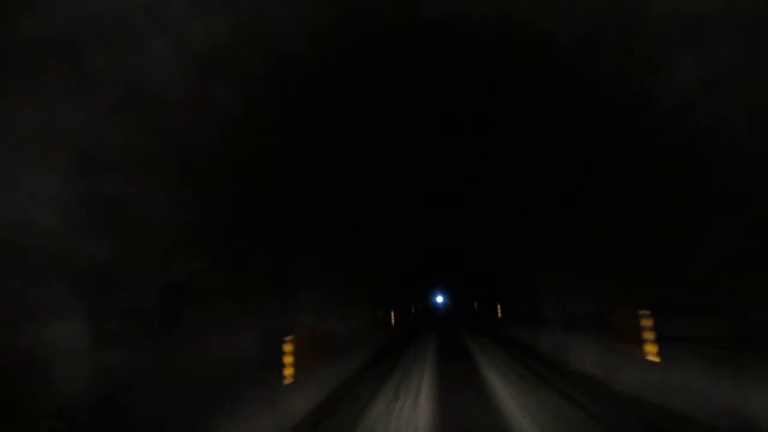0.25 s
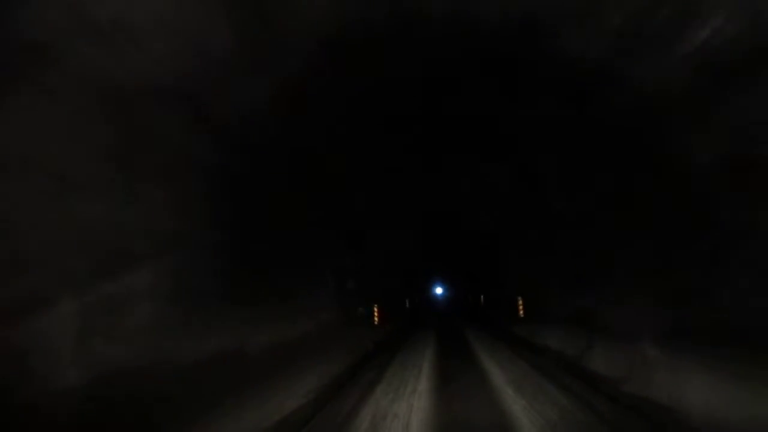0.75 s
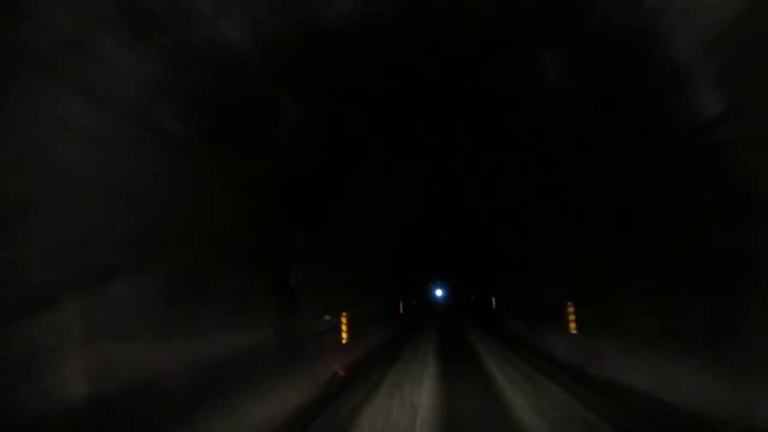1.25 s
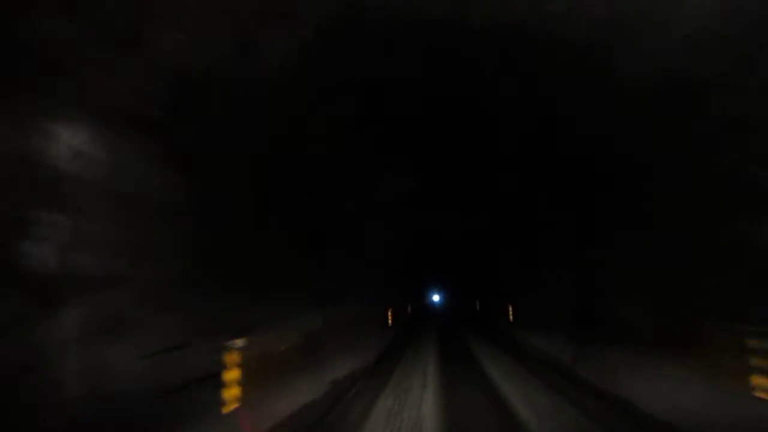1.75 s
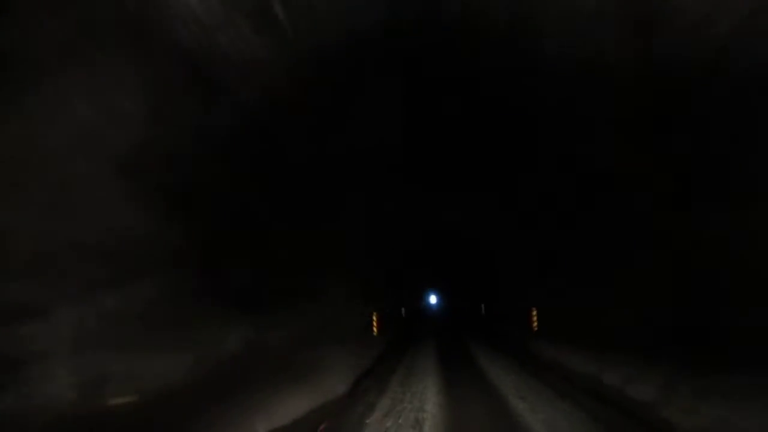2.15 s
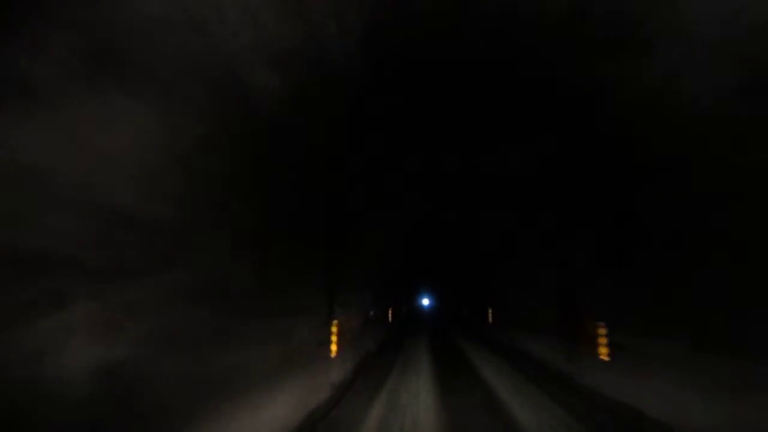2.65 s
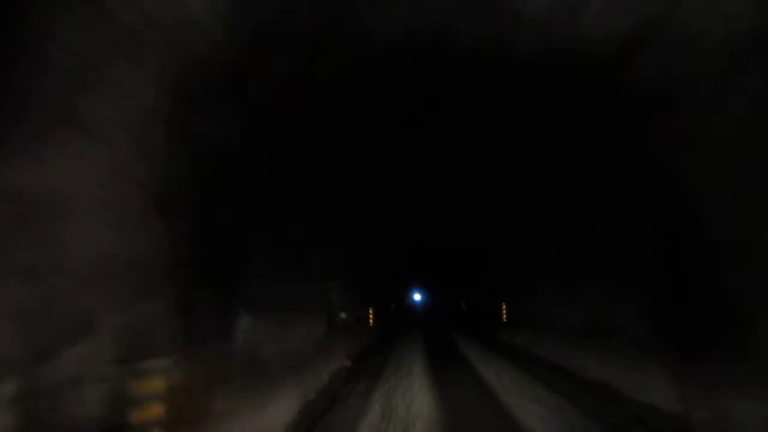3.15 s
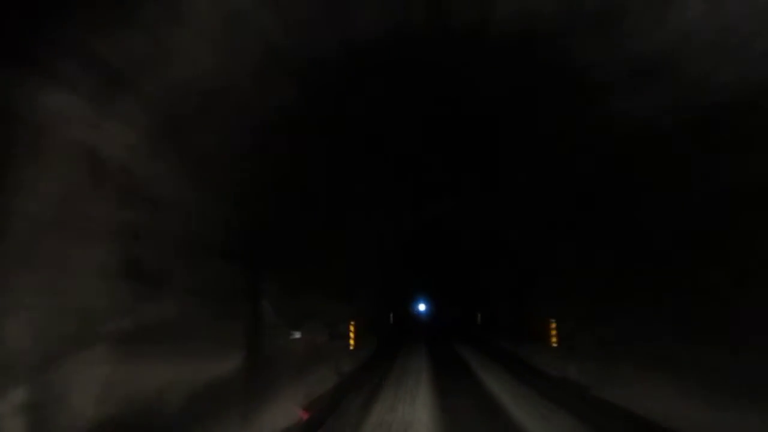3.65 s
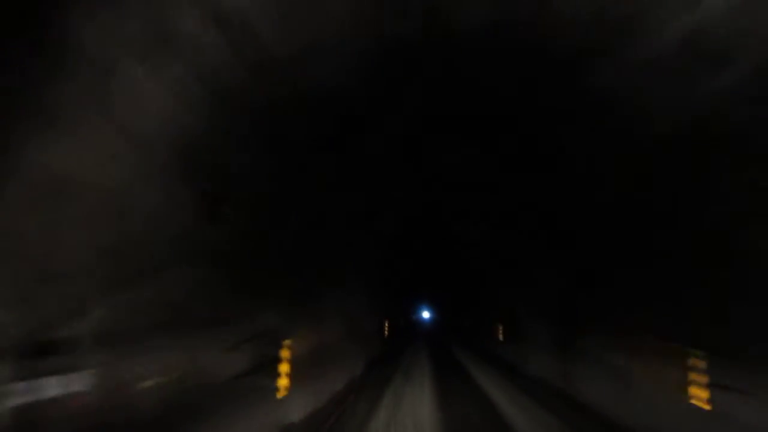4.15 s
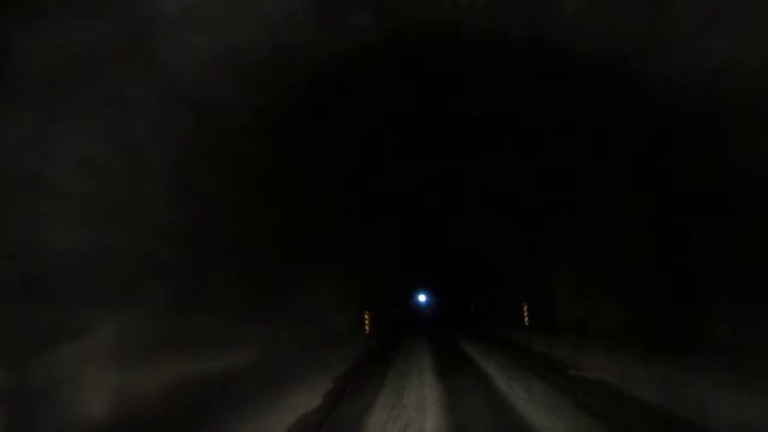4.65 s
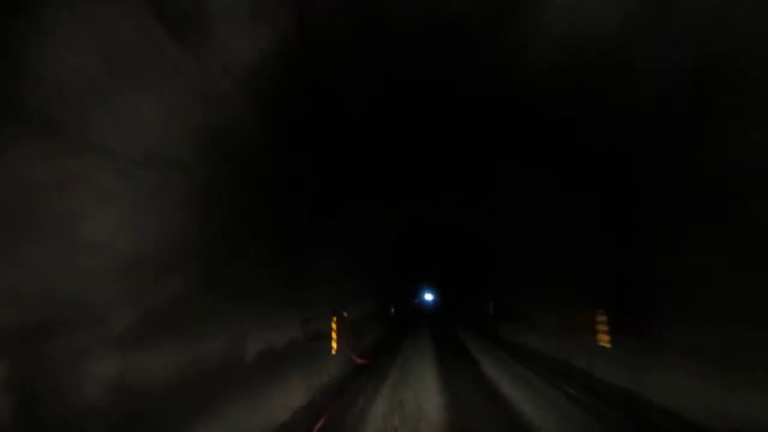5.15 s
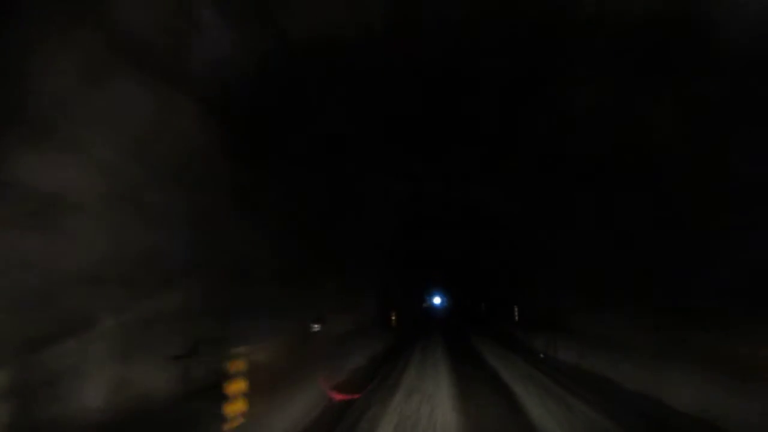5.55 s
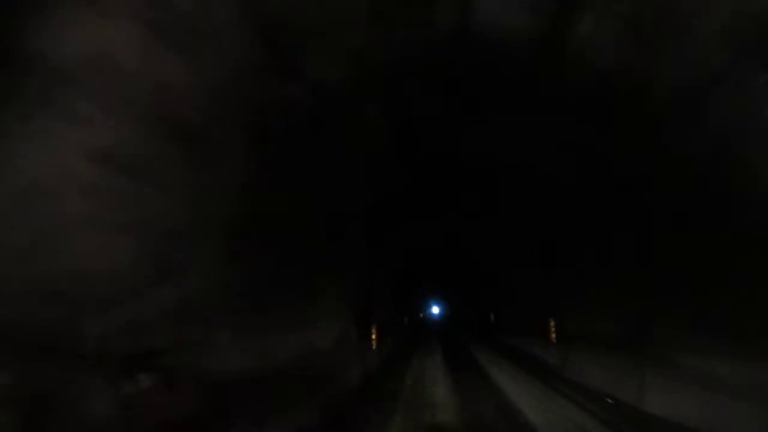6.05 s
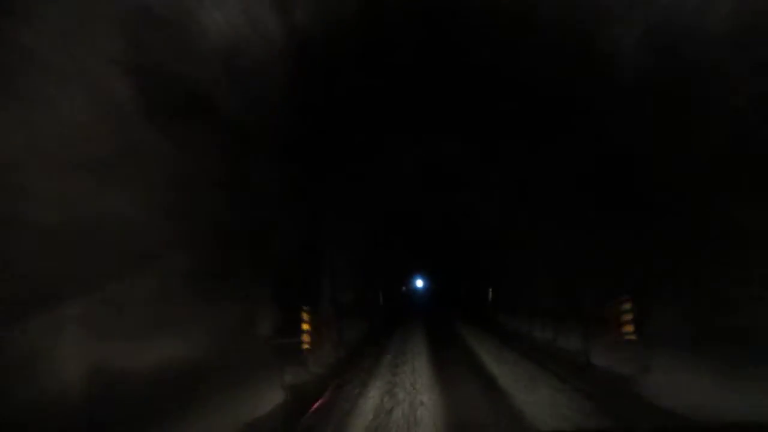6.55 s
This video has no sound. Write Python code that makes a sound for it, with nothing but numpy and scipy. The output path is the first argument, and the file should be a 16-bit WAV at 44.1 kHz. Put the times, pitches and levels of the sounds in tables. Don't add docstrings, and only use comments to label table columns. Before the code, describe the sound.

Inside a car driving steadily through a wet tunnel: deep bumpy boom, tyre roar and hiss, faint rattles, one sharp stone crack near the end.

```python
import sys
import numpy as np
from scipy import signal
from scipy.fft import rfft, irfft
from scipy.io import wavfile
from scipy.ndimage import uniform_filter1d

SR = 44100
rng = np.random.default_rng(int(sys.argv[2]) if len(sys.argv) > 2 else 0)


def generate_wav(signal):
    frames = np.transpose(np.atleast_2d(signal))
    scaled = np.clip(frames, -1, 1) * 32767
    pcm = np.round(scaled).astype(np.int16)
    wavfile.write(sys.argv[1], SR, pcm)


def invert_db(x):
    u = np.asarray(x, float) / 20
    return 10 ** u


N = 300321


def rms_one(x):
    return x / np.sqrt(np.mean(x ** 2) + 1e-20)


def in_time(rows):
    s, *columns = np.transpose(rows)
    return [np.interp(np.arange(N) / SR, s, c) for c in columns]


def drift(rate):
    r = np.exp(-80 * np.pi * rate / SR)
    coarse = rng.standard_normal(N // 40 + 2002)
    slow = signal.lfilter([1], [1, -2 * r, r * r], coarse)[2000:]
    return np.interp(np.arange(N) / 40, np.arange(len(slow)), rms_one(slow - slow.mean()))


def coloured(spectrum, patchy_db, white=None):
    hz = np.maximum(np.arange(N // 2 + 1) * SR / N, 1)
    points = np.array(spectrum)
    white = rng.standard_normal(N) if white is None else white
    shaped = rfft(white) * invert_db(np.interp(np.log(hz), np.log(points[:, 0]), points[:, 1]))
    out, together = 0, drift(33)
    for centre in np.arange(np.log2(points[0, 0]), np.log2(points[-1, 0]) + .5, .5):
        window = np.clip(1 - 2 * np.abs(np.log2(hz) - centre), 0, 1)
        flicker = invert_db(patchy_db * (0.26 * together + drift(4.6)))
        out = out + irfft(shaped * window, N) * flicker
    return rms_one(out)


def ring(clicks, hz, t60):
    r, w = invert_db(-60 / (t60 * SR)), 2 * np.pi * hz / SR
    return signal.lfilter([0, np.sin(w)], [1, -2 * r * np.cos(w), r * r], clicks + 1e-18)


def strikes(times, strengths):
    clicks = np.zeros(N)
    clicks[np.round(np.array(times) * SR).astype(int)] = strengths
    return clicks


def swells(times, levels_db, rise_s, fall_s, rest_db):
    t = np.arange(0, N + 64, 64) / SR
    late = t[:, None] - times
    power = np.exp(-(late / np.where(late < 0, rise_s, fall_s)) ** 2) @ invert_db(2 * levels_db)
    return 10 * np.log10(np.interp(np.arange(N) / SR, t, power) + invert_db(2 * rest_db))


def bumps():
    # time in seconds, shock in dB, twist of the body in dB over the shock.
    shocks = [(.11, -20.5, -1), (.3, -24, 3.5), (.45, -21, -2), (.68, -19.5, -10), (.85, -19.5, -13.5),
              (1.14, -16, -6.5), (1.52, -23, -8), (1.76, -17, -10), (1.99, -17.5, -6.5), (2.2, -20.5, -20),
              (2.45, -22, -13), (2.72, -21, -2), (2.95, -24, -10), (3.11, -21.5, -11), (3.49, -22.5, -3.5),
              (3.68, -20, -14.5), (3.87, -19.5, -15), (4.06, -20, -9.5), (4.42, -17.5, -7),
              (4.72, -19.5, -2), (4.951, -18, -15), (5.2, -21.5, -3), (5.44, -21, -1.5), (5.62, -23, -7),
              (5.8, -25.5, -13), (5.97, -21.5, -2.5), (6.25, -29, -5), (6.521, -19, 2), (6.7, -17, -13)]
    s, shock_db, twist_db = np.transpose(shocks)
    boom_db = swells(s, shock_db, rise_s=0.067, fall_s=0.085, rest_db=-33)
    cabin_db = swells(s, shock_db + twist_db, rise_s=0.044, fall_s=0.058, rest_db=-28.5)
    return boom_db, cabin_db


def shaken(modes, level_db, steadiness):
    hz, out = np.arange(N // 2 + 1) * SR / N + 0.12, 0
    for mode_hz, width_hz, mode_db in modes:
        response = 1 / (1 + 1j * (hz ** 2 - mode_hz ** 2) / (hz * width_hz))
        out = out + invert_db(mode_db) * response ** 2 * rfft(rng.standard_normal(N))
    out = irfft(out, N)
    swell = np.sqrt(uniform_filter1d(uniform_filter1d(out ** 2, size=3000), size=3000))
    return invert_db(level_db) * rms_one(out / swell ** np.clip(steadiness, 0, 1))


def boom(boom_db, cabin_db):
    # frequency in Hz, width in Hz, level in dB.
    air_mode = [(37.9, 5.1, 0)]
    # frequency in Hz, width in Hz, level in dB.
    body_modes = [(12.9, 11, -6), (27.2, 14.5, -6.5), (54.8, 15.8, -1), (66.7, 9.4, -6)]
    return shaken(air_mode, boom_db, steadiness=1.0) + shaken(body_modes, cabin_db + 3.0, steadiness=0.41)


def rumble(cabin_db, coarse_db):
    # frequency in Hz, level in dB per Hz.
    rumble_spectrum = [(80, -28), (100, -5), (118, -6.5), (140, -9), (158, -6), (175, -7.5), (200, -6.5),
                       (235, -9), (270, -9), (290, -14.5), (315, -20), (430, -36)]
    rumble_db = -31 + 0.097 * (cabin_db - cabin_db.mean()) + 0.29 * coarse_db
    return invert_db(rumble_db) * coloured(rumble_spectrum, patchy_db=0.22)


def roar(coarse_db):
    # frequency in Hz, level in dB per Hz.
    roar_spectrum = [(180, -15.5), (300, -5.5), (349, 0.5), (412, -4), (614, -5.5), (714, -3.5), (909, -8),
                     (1200, -17), (1360, -18), (2200, -38.5), (2860, -50), (4840, -120)]
    return invert_db(-37.5 + 0.49 * coarse_db + 1.5) * coloured(roar_spectrum, patchy_db=0.52)


def engine():
    # time in seconds, firing rate in Hz, tone level in dB.
    firing = [(0, 90, -26), (.28, 90.5, -23.5), (.65, 90.26, -22), (.82, 90.4, -32), (1.01, 90.3, -21),
              (1.38, 90.85, -26), (2.07, 90.5, -24.5), (2.6, 90.5, -30), (2.75, 89.95, -27.5),
              (3.22, 89.9, -23.5), (3.39, 90.13, -31), (3.58, 90.2, -22.5), (4.3, 91, -24),
              (4.91, 90.85, -23.5), (5.69, 91.7, -25), (6.07, 93.35, -23), (6.6, 94.4, -28.5),
              (6.81, 92.3, -24)]
    firing_hz, tone_db = in_time(firing)
    phase = 2 * np.pi * np.cumsum(firing_hz * (1 + 0.0036 * drift(5.2))) / SR
    tone = np.sqrt(2) * np.sin(phase) * invert_db(0.6 * drift(2.1))
    rough = drift(19) * np.sin(phase) + drift(6.2) * np.cos(phase)
    return invert_db(tone_db) * (0.75 * tone + 0.3 * rough)


def tread(tread_db):
    # frequency in Hz, level in dB per Hz.
    hiss_spectrum = [(900, -38), (1500, -3), (2000, -2.5), (2300, -8), (2700, -7.5), (3600, -14.5),
                     (5000, -20.5), (7000, -26), (9000, -52)]
    return invert_db(tread_db + 1.34) * coloured(hiss_spectrum, patchy_db=-0.07)


def spray(coarse_db):
    # deepest point in seconds, width in seconds, spray level in dB.
    puddles = [(0, 0.036, -60), (.14, .05, -67), (.38, .12, -64.5), (1.0, .07, -76), (1.4, 0.023, -67),
               (1.76, 0.04, -69), (1.97, .12, -67), (2.26, .05, -63.5), (2.45, 0.19, -63),
               (2.7, 0.071, -56), (2.84, 0.094, -55.5), (3.18, 0.088, -57.5), (3.5, 0.052, -68),
               (3.8, .07, -62), (3.95, .09, -64), (4.2, 0.12, -56), (4.37, 0.086, -57.5),
               (4.72, 0.043, -63), (4.83, 0.17, -57), (5.0, 0.1, -60.5), (5.25, 0.039, -62),
               (5.41, 0.051, -63), (5.97, 0.061, -60.5), (6.1, 0.073, -63), (6.42, 0.079, -58.5),
               (6.58, .1, -58.5), (6.81, .04, -60)]
    # frequency in Hz, level in dB per Hz.
    water_spectrum = [(1500, -34), (3000, -1.5), (4500, -1.5), (6500, -2.5), (9000, -3), (11000, -6),
                      (13500, -12), (15000, -16), (16500, -21)]
    s, width_s, spray_db = np.transpose(puddles)
    water_db = swells(s, spray_db, rise_s=0.92 * width_s, fall_s=width_s, rest_db=-67.5 + coarse_db)
    sizes = invert_db(2.2 * np.minimum(rng.exponential(1, N), 5)) * rng.choice([-1, 1], N)
    born = rng.random(N) < 1500 * invert_db(5 * drift(25)) / SR
    white = rng.standard_normal(N) + 0.67 * rms_one(sizes * born)
    return invert_db(water_db + 1.0) * coloured(water_spectrum, patchy_db=-0.3, white=white)


def stone():
    # time in seconds, peak in dB.
    impact = [
        (5.943, -13),
    ]
    # frequency in Hz, level in dB, decay t60 in seconds.
    panel_modes = [(724, -13, 0.019), (1150, -10, 0.047), (1480, -14, 0.039), (1840, -9, 0.02),
                   (2350, -3, 0.015), (2530, -4, 0.016), (3346, -13, 0.018), (3580, -8, 0.029),
                   (4880, -9, 0.015)]
    s, peak_db = impact[0]
    s = s + .0016
    crack = strikes([s], [-invert_db(peak_db + 13.0)])
    crack = signal.sosfilt(signal.butter(1, [300, 6000], "band", fs=SR, output="sos"), crack)
    crack = signal.sosfilt(signal.butter(2, 9000, fs=SR, output="sos"), crack)
    skip_heights = invert_db(peak_db - np.array([6, 5, 9])) * [-1, 1, -1]
    skips = strikes([s + .0008, s + 0.00161, s + 0.0038], skip_heights)
    skips = signal.lfilter([.4], [1, -.6], skips)
    fade = invert_db(-60 / (0.024 * SR))
    tail = signal.lfilter([1], [1, -fade], strikes([s + 0.00061], [invert_db(peak_db - 11)]))
    tail = tail * rng.standard_normal(N)
    tail = signal.sosfilt(signal.butter(2, [900, 6500], "band", fs=SR, output="sos"), tail)
    return crack + tail + sum(invert_db(db - 1.5) * ring(skips, hz, t60) for hz, db, t60 in panel_modes)


def rattle():
    # time in seconds, peak in dB, lowest mode in dB.
    taps = [(0.119, -42.5, 9.5), (1.1774, -39, 2), (1.2084, -40, -4), (1.2404, -54, 0), (1.2710, -43, -9),
            (1.3010, -45, -3), (1.3320, -40, 6), (1.3625, -53, 2), (1.3935, -38.5, 9), (1.4234, -39.5, -6),
            (1.7353, -33, 2), (2.2541, -38, 5), (2.2883, -40, -1), (5.181, -40, -1), (5.8524, -50, 16),
            (6.0426, -40.5, 4), (6.32, -40, 1)]
    # frequency in Hz, level in dB, decay t60 in seconds.
    part_modes = [(2680, 0, .04), (4080, -1, 0.028), (4740, 1, 0.025), (5420, -3.5, .04), (6110, -16, .03),
                  (6540, 0, 0.027), (7200, -8, .025), (7080, -6, .03), (8650, -10, .025), (9200, -10, .025)]
    s, peak_db, lowest_db = np.transpose(taps)
    luck = rng.normal(0, 1.2, (len(s), len(part_modes)))
    luck[:, 0] = lowest_db
    out, steps = np.zeros(N), np.arange(110)
    for k, (hz, db, t60) in enumerate(part_modes):
        contact = np.hanning(len(steps)) * np.cos(2 * np.pi * hz * steps / SR + k * k) / 28
        clicks = strikes(s, invert_db(peak_db + db - 11.5 + luck[:, k]))
        out += ring(np.convolve(clicks, contact)[:N], hz, t60)
    return out


def grit():
    # time in seconds, level in dB, brightness in dB per band.
    grains = [(.3185, -54, -5), (.3671, -58, -1), (.6836, -59.5, -10), (.9946, -59, -6), (1.1204, -56, -3),
              (.056, -62, -3), (1.729, -52.5, -5), (1.7634, -54, -2), (1.8107, -56, -2), (1.9036, -60, -7),
              (2.2318, -53, -3), (2.3127, -49.5, -9.5), (2.7846, -54.5, -6), (2.9977, -55, -4),
              (3.1459, -52, -6), (3.4955, -52, -3), (3.595, -62, -15), (3.738, -54, -5), (4.0884, -51, -6),
              (4.345, -52, -2), (4.398, -51, -5), (4.4153, -56, -7), (5.26, -53, 2), (5.3714, -57, -6),
              (5.927, -57, -15), (6.3676, -52, -1), (6.4694, -52, -1), (6.7285, -55, -12),
              (6.777, -52.5, -12), (6.7844, -51.5, -12.5)]
    faint_s = [.0174, 0.16, .249, .468, 0.551, 0.604, .6479, .7594, .8524, 1.2534, 1.285, 1.36, 1.5, 2.324,
               2.58, 4.1, 4.6434, 5.1969, 5.5, 5.785, 5.855, 6.3, 6.1, 6.625, 0.076, 5.675]
    # low edge in Hz, high edge in Hz.
    arch_bands = [(1400, 3800), (4200, 7300), (7500, 13000)]
    faint_grains = [(s, -61, -6) for s in faint_s]
    s, middle_db, bright_db = np.transpose(grains + faint_grains)
    band_db = middle_db - bright_db, middle_db - 2.5, middle_db + bright_db
    out = np.zeros(N)
    for (low, high), level_db, t60 in zip(arch_bands, band_db, (.06, .04, .035)):
        fade = invert_db(-60 / (t60 * SR))
        puff = signal.lfilter([1], [1, -fade], strikes(s, invert_db(level_db + 1.0)) + 1e-18)
        puff = signal.lfilter([.08], [1, -.92], puff)
        sos = signal.butter(2, [low, high], "band", fs=SR, output="sos")
        out += signal.sosfilt(sos, puff * rng.standard_normal(N)) * np.sqrt(SR / 2 / (high - low))
    return out


def pings():
    # time in seconds, peak in dB.
    hard_grains = [
        (5.261, -38.5),
        (5.372, -50.5),
        (5.785, -55),
        (1.6154, -55),
    ]
    # frequency in Hz, level in dB, decay t60 in seconds.
    shield_modes = [(7700, -4, .012), (8500, -2, .015), (9150, -1, .018), (9800, -8, .012),
                    (11500, -12, .01)]
    s, peak_db = np.transpose(hard_grains)
    contact = np.hanning(60) * rng.standard_normal(60)
    clicks = np.convolve(strikes(s, invert_db(peak_db - 12)), contact)[:N]
    clicks = signal.sosfilt(signal.butter(2, 6000, "high", fs=SR, output="sos"), clicks)
    return sum(invert_db(db) * ring(clicks, hz, t60) for hz, db, t60 in shield_modes)


def sand():
    sizes = invert_db(3.5 * np.minimum(rng.exponential(1, N), 3))
    born = rng.random(N) < 45 / SR
    fade = invert_db(-60 / (0.018 * SR))
    puff = signal.lfilter([1], [1, -fade], sizes * born + 1e-18) * rng.standard_normal(N)
    return invert_db(-70) * signal.sosfilt(signal.butter(2, [5500, 14500], "band", fs=SR, output="sos"), puff)


def whine():
    return invert_db(-80) * np.sin(2 * np.pi * 7852 * np.arange(N) / SR)


def scene():
    # time in seconds, tread hiss in dB.
    surface = [(0, -55), (.35, -56.5), (.75, -60.5), (1.1, -56.5), (1.5, -57), (1.85, -55), (2.15, -57.5),
               (2.7, -54), (3.1, -54), (3.6, -52), (4.35, -52), (4.9, -54.5), (5.4, -53), (6.05, -54),
               (6.4, -54), (6.63, -54), (6.81, -52.5)]
    tread_db, = in_time(surface)
    coarse_db = tread_db - tread_db.mean()
    boom_db, cabin_db = bumps()
    road = boom(boom_db, cabin_db) + rumble(cabin_db, coarse_db) + roar(coarse_db)
    tyres = tread(tread_db) + spray(coarse_db)
    hits = stone() + rattle() + grit() + pings() + sand()
    return (road + engine() + tyres + hits + whine())[None, :]


def top_cut(x):
    return signal.sosfilt(signal.butter(12, 16500, fs=SR, output="sos"), x)


def record(dry):
    ends = np.clip(np.minimum(np.arange(N), np.arange(N)[::-1]) / 200, 0, 1)
    rounded = ends * .8 * np.tanh(dry / .8)
    mix = signal.sosfilt(signal.cheby2(14, 50, 16100, fs=SR, output="sos"), rounded)
    return top_cut(mix)


dry = scene()
out = record(dry)
generate_wav(out)
```